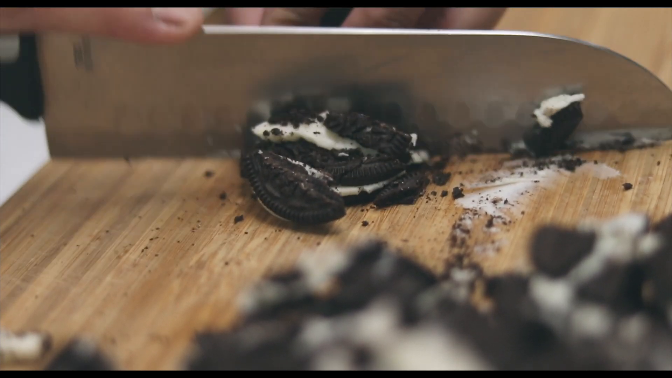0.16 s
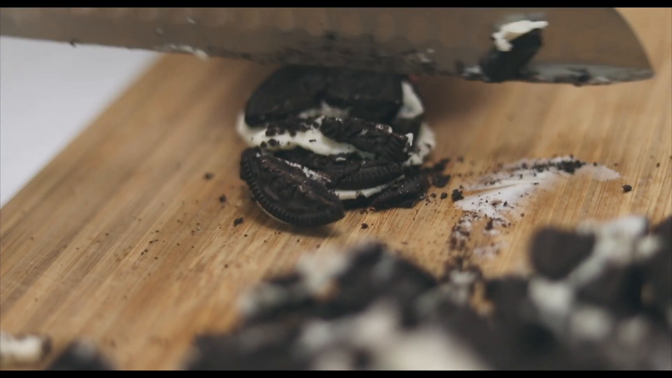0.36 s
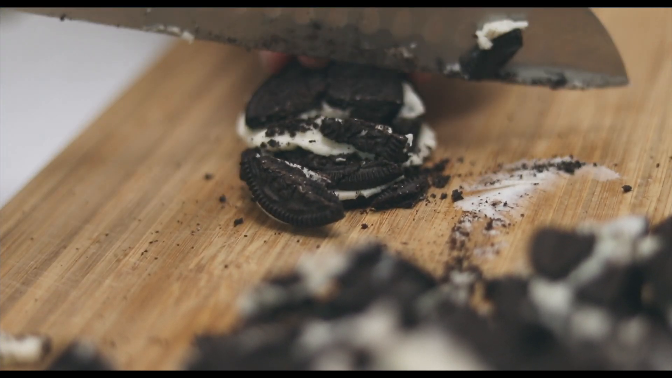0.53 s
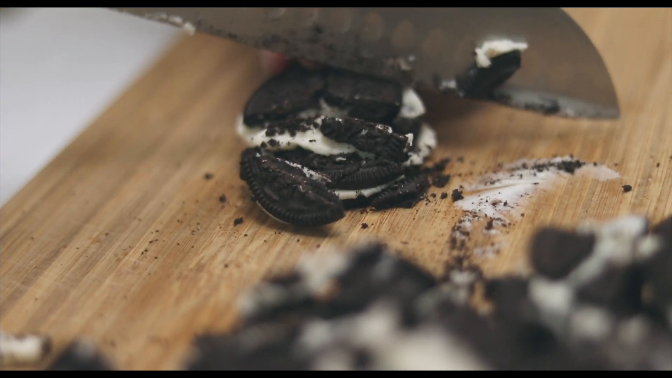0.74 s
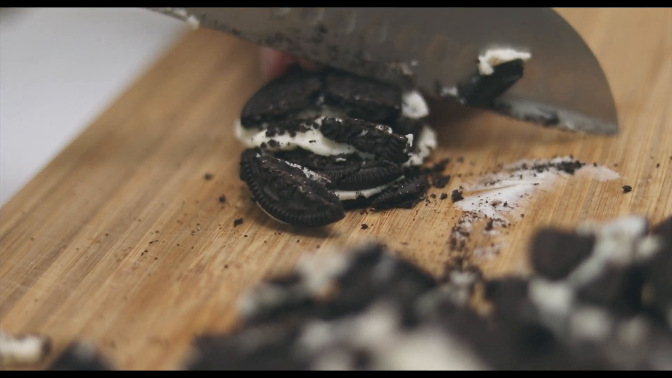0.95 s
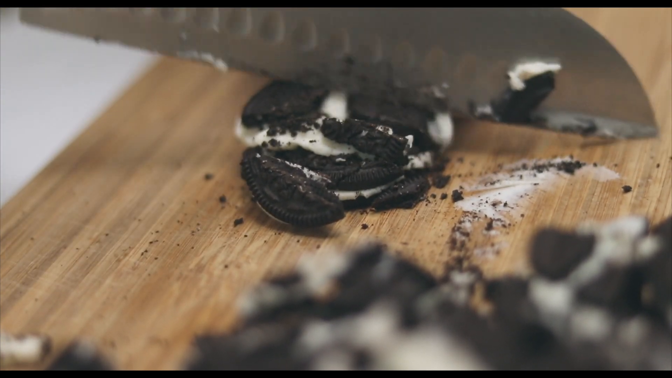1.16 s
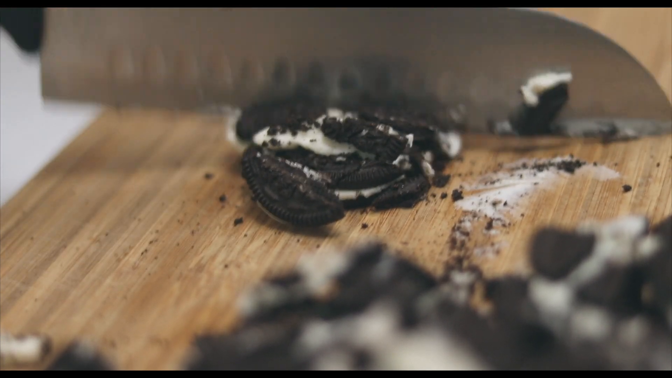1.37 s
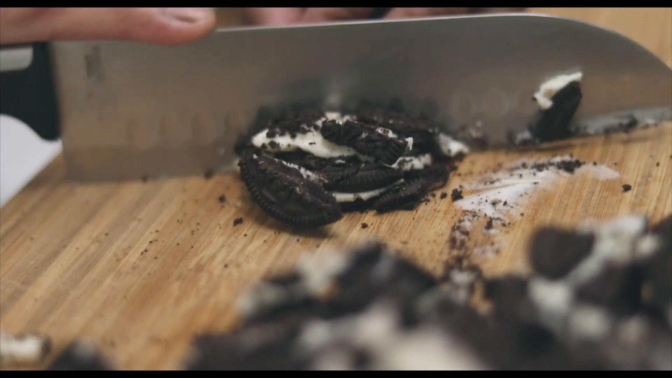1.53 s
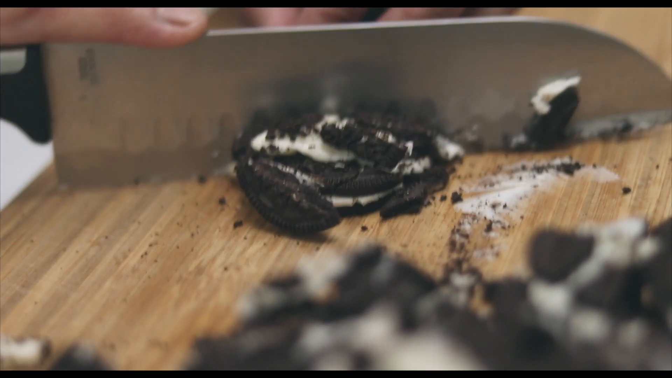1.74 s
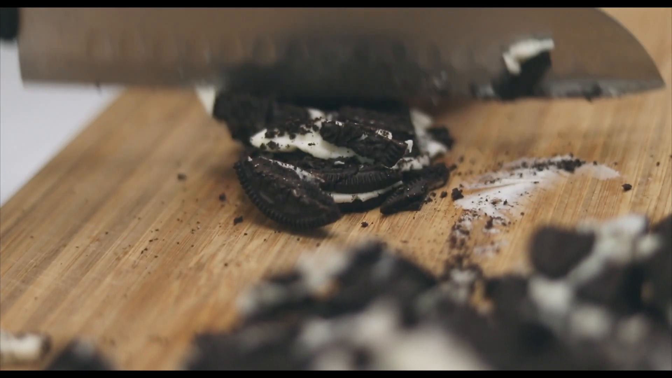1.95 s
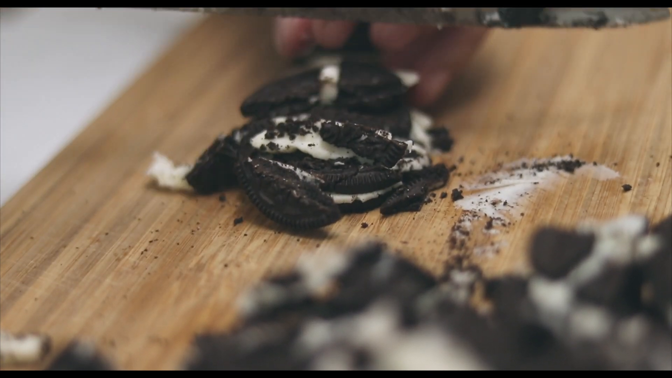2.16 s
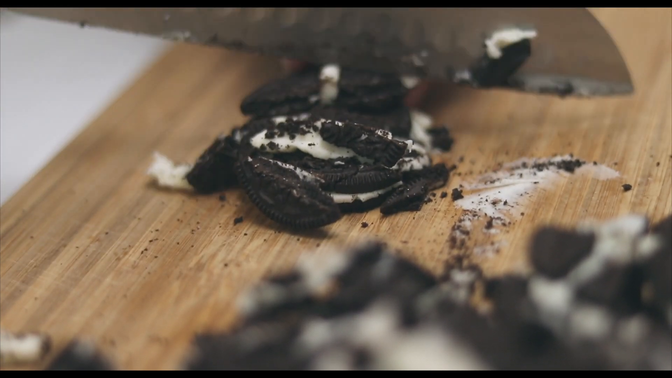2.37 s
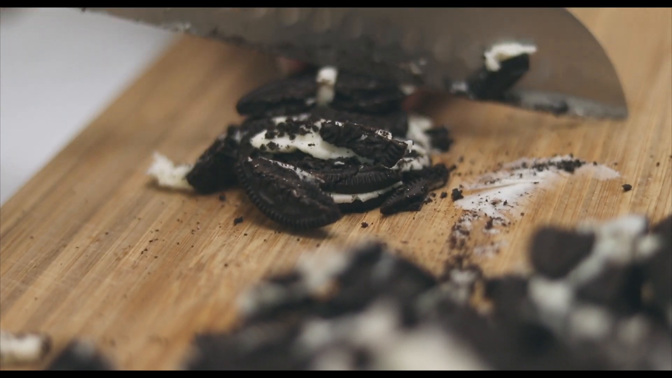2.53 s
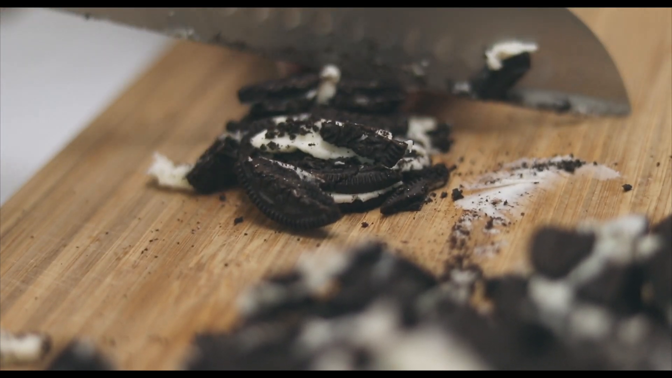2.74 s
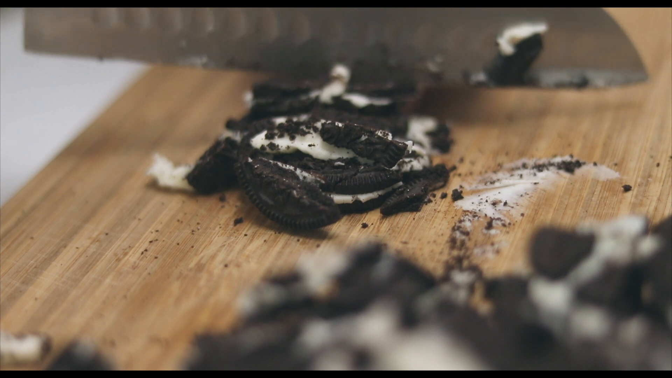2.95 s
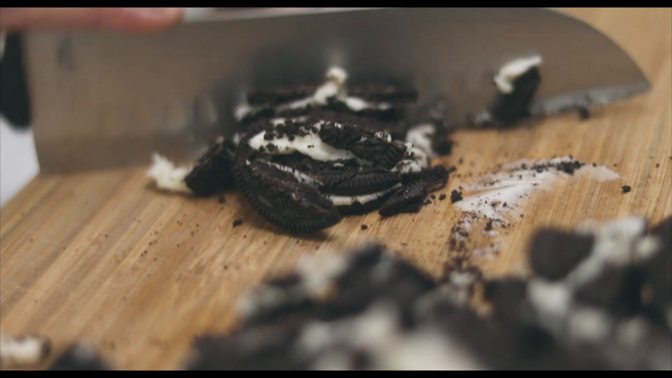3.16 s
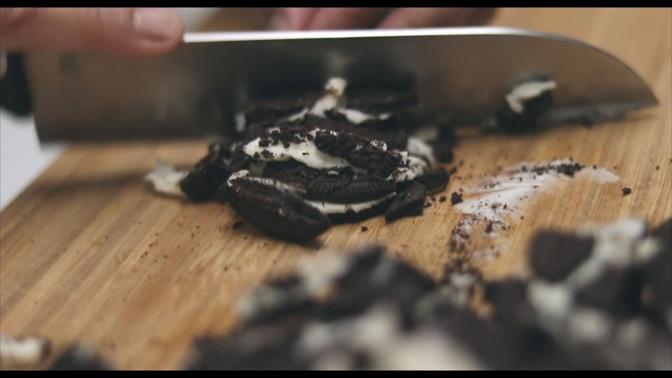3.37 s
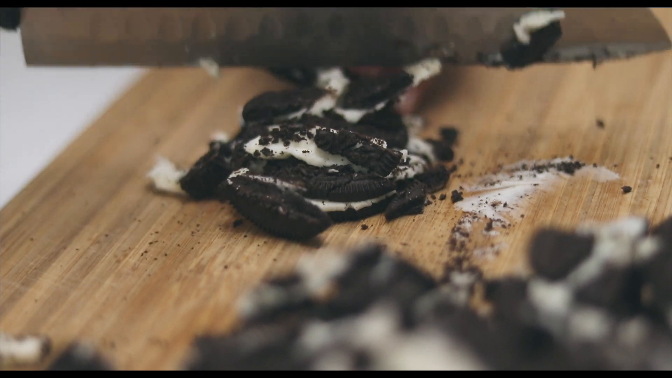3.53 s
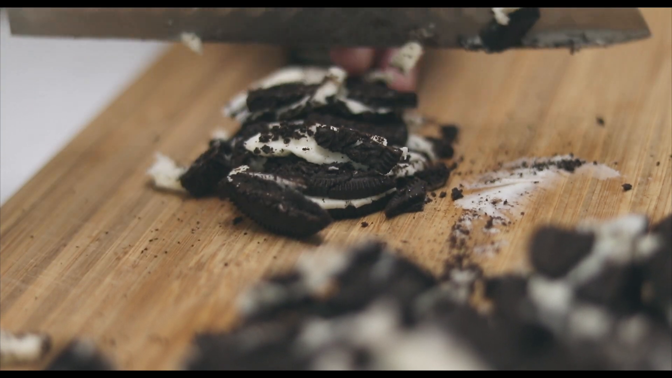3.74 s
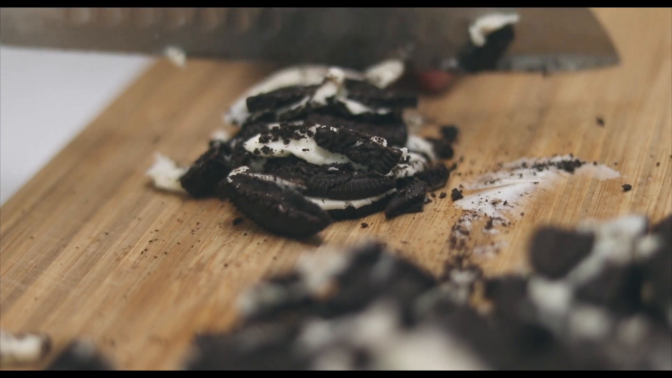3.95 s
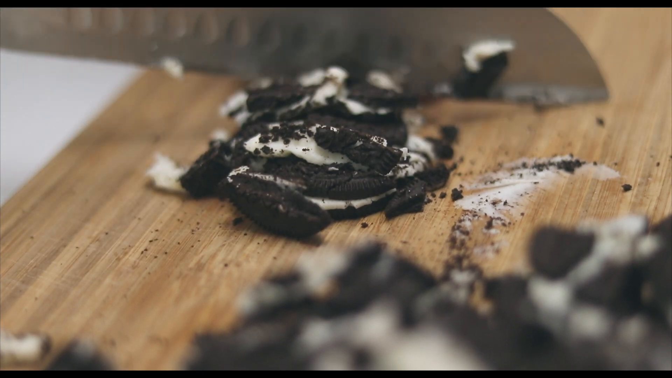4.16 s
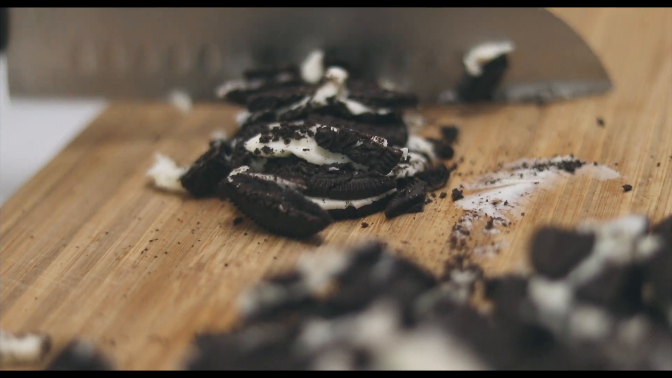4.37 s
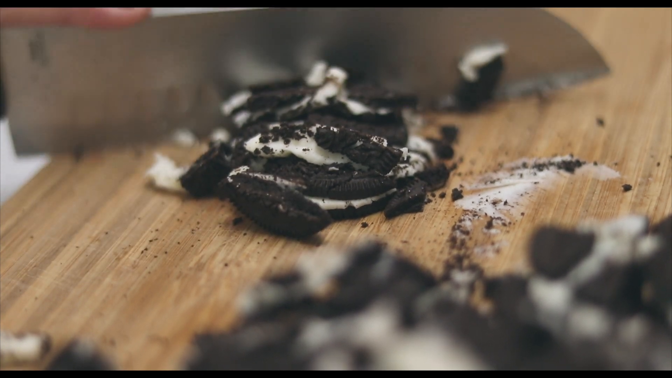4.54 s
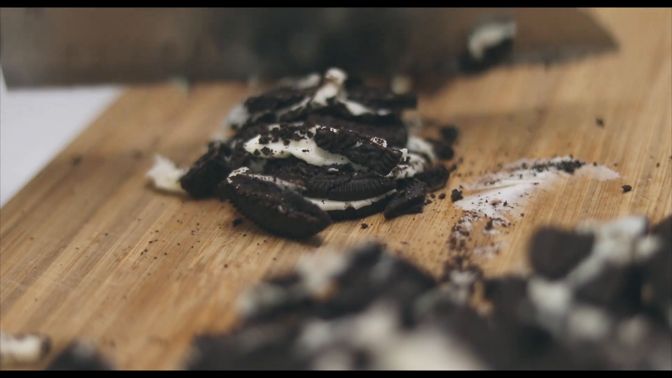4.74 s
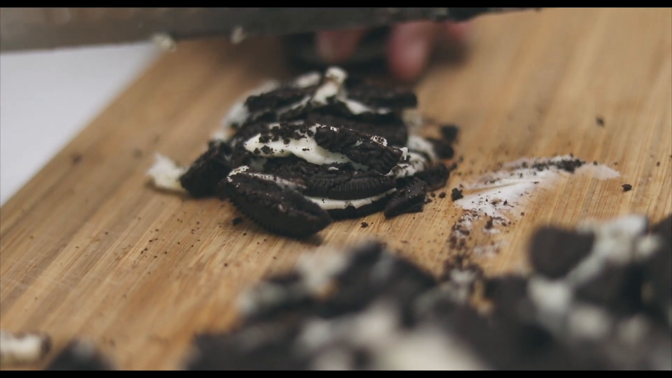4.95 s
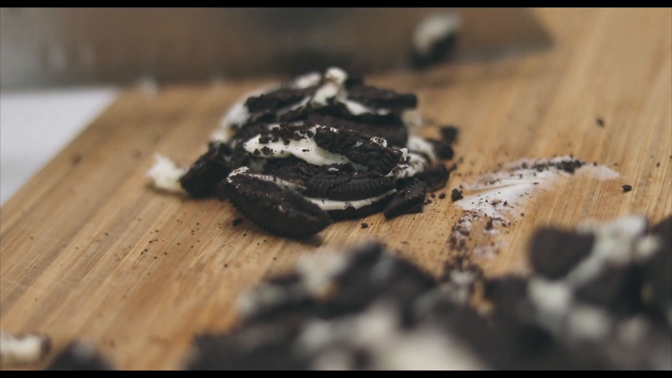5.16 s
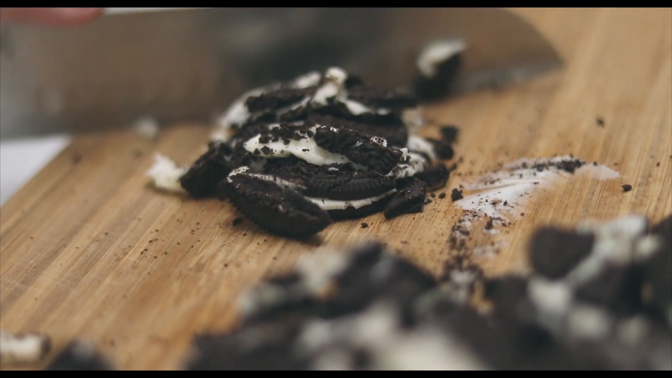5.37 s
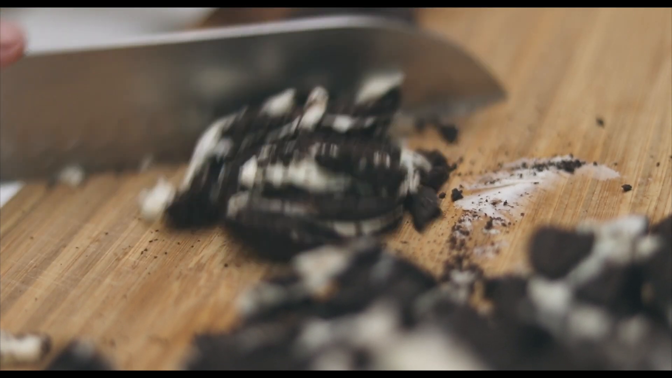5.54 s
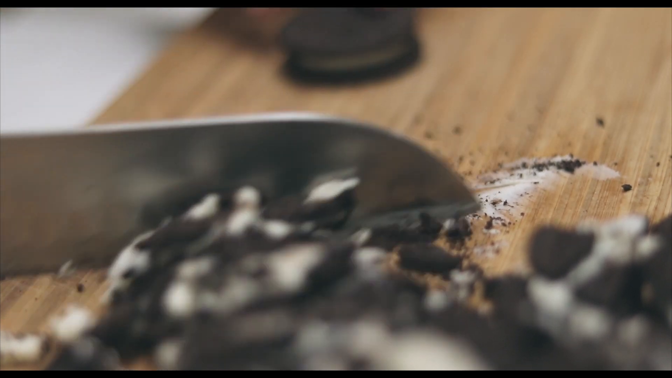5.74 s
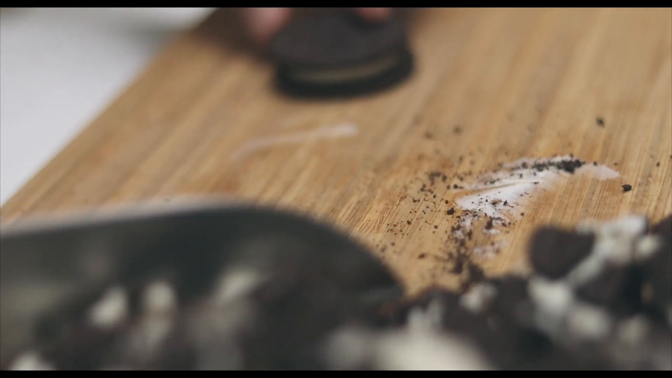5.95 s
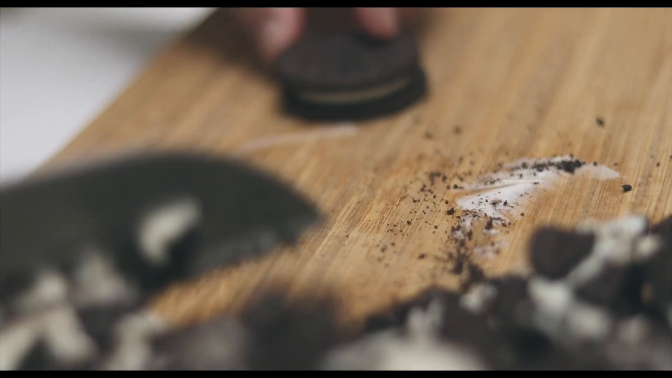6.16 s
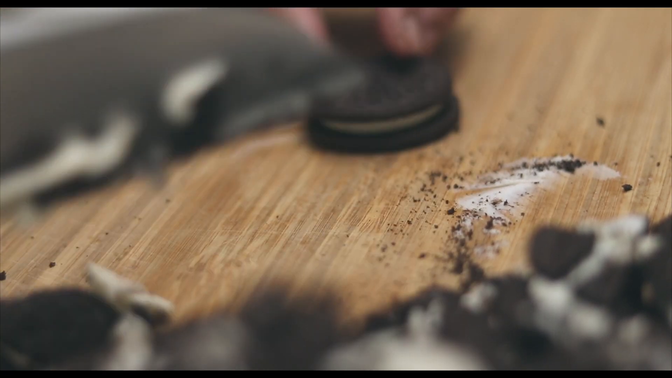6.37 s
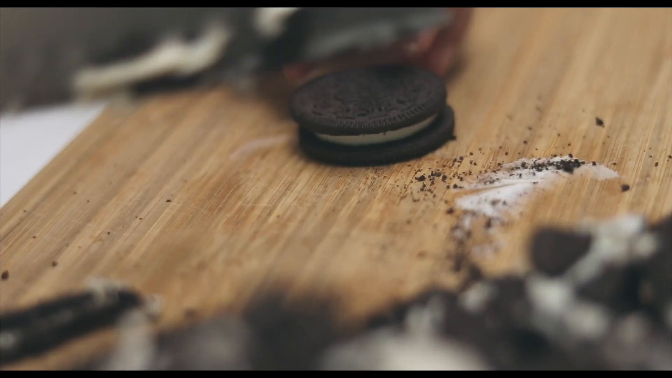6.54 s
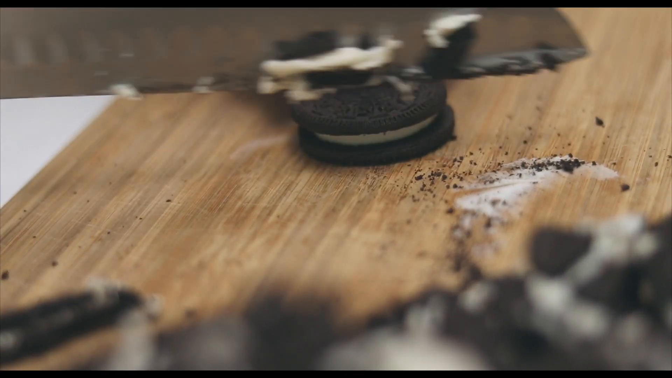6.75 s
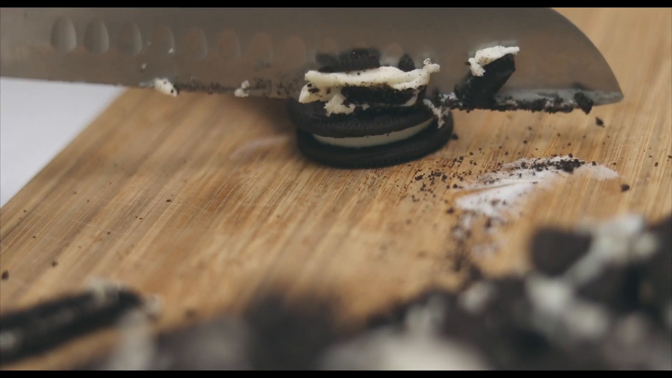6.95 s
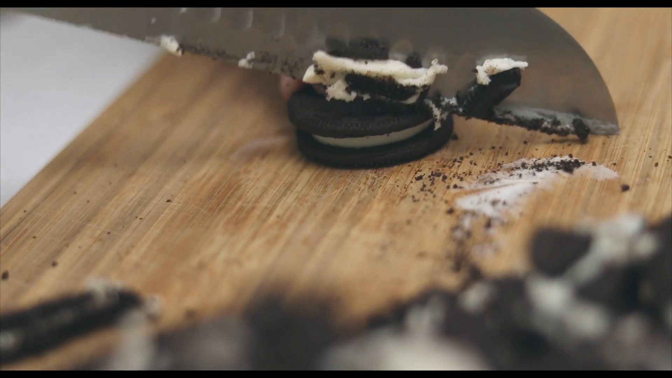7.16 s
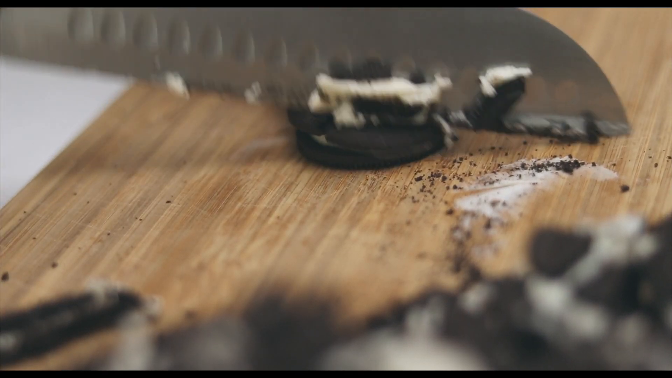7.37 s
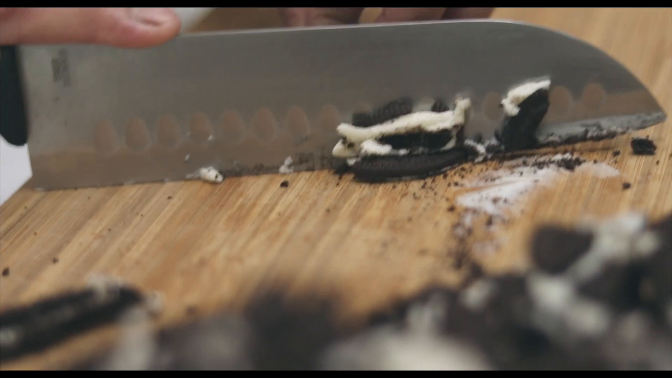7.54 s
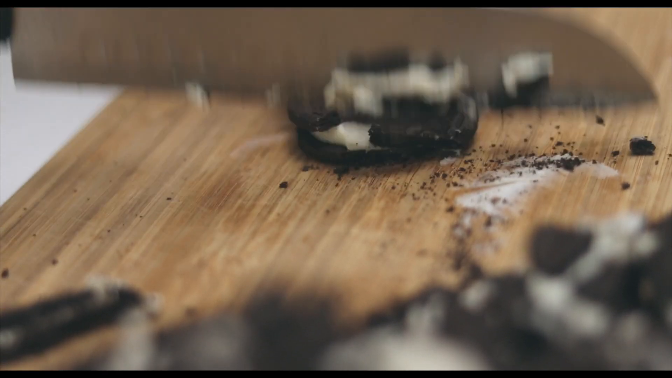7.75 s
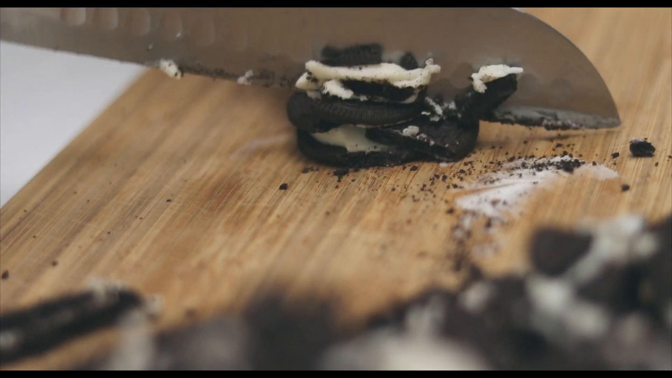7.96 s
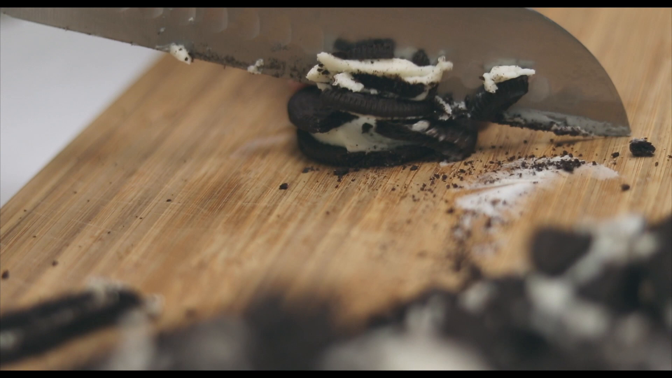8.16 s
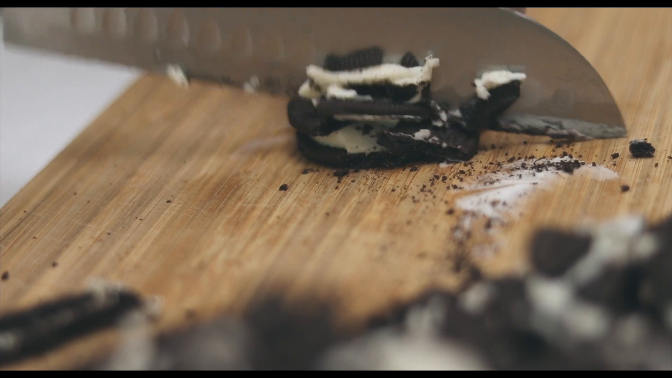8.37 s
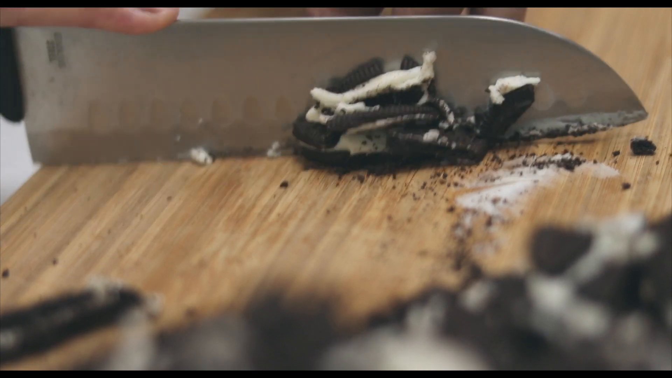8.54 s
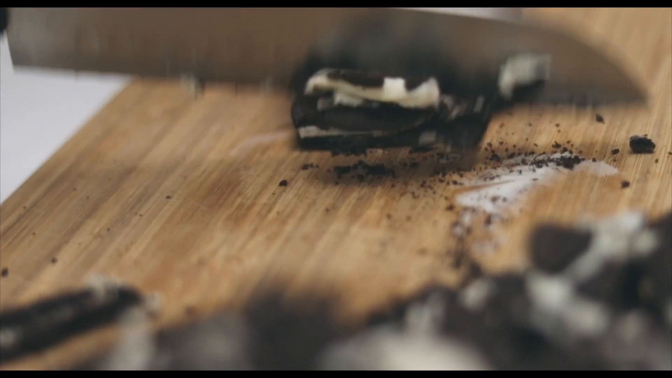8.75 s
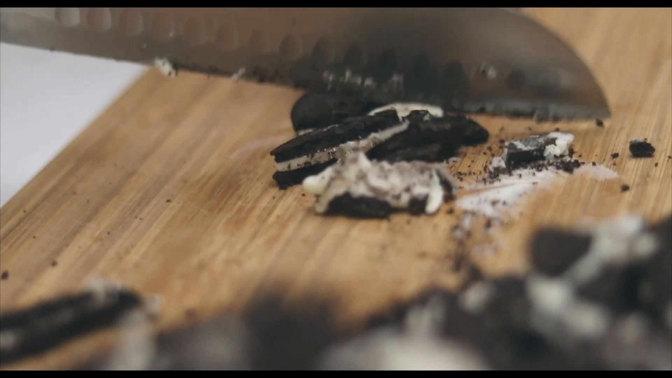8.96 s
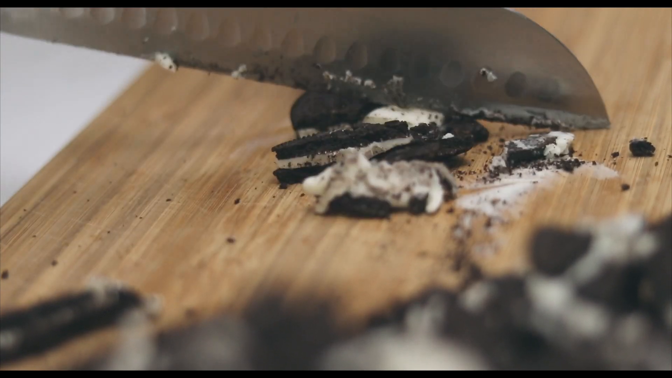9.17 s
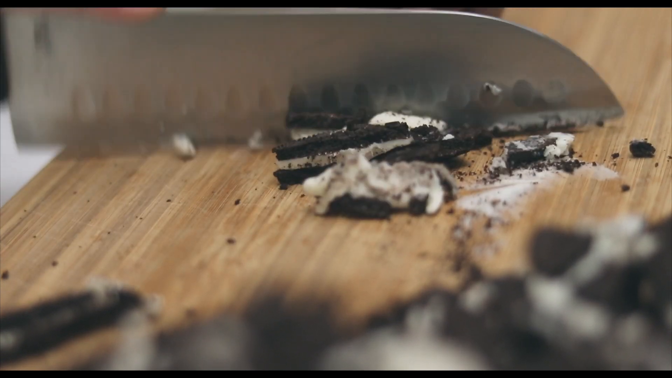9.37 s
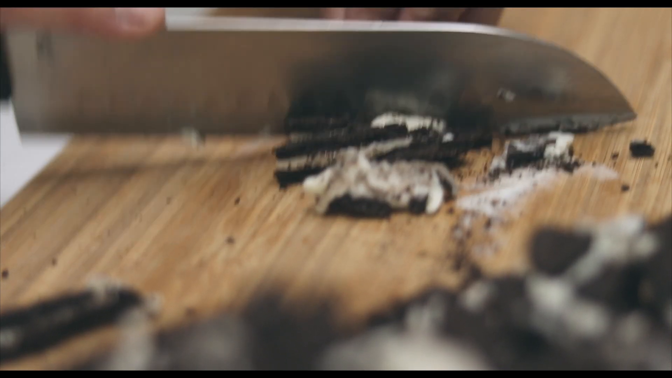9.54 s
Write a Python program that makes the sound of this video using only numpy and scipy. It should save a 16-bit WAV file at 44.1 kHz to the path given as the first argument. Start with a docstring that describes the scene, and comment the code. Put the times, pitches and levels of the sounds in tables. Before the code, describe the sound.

A heavy kitchen knife chops crisp cream-filled cookies on a wooden board, very close to the microphone. Sharp snaps and gritty crunches lead into hard knocks with brief blade ring. Around the middle the blade scrapes pieces aside, singing slightly, then smaller, drier cuts follow. The kitchen adds a short, lively tail over faint air and hum.

```python
"""First comes the crisp crackle of a knife leaning on sandwich cookies, with sticky filling peeling off.
Each cut snaps and crunches through the biscuit and knocks on a wooden board, close to the microphone.
Midway the blade sweeps the pieces aside. Tiny random cracks shake ringing board and blade tones;
the drag also makes the steel sing. Noise makes the board's thuds and the room air, and a faint hum runs on.
The kitchen rings after each blow, and the hardest blows overload the recorder."""
import sys
import numpy as np
from scipy import signal
from scipy.io import wavfile
from scipy.ndimage import map_coordinates

SR = 44100
rng = np.random.default_rng(int(sys.argv[2]) if len(sys.argv) > 2 else 0)


def int16_out(signal):
    """Quantize to a 16-bit WAV file."""
    q = np.round(np.clip(np.atleast_2d(signal).T, -1, 1) * 32767)
    wavfile.write(sys.argv[1], SR, q.astype(np.int16))


N = 423801

# steady room air and an appliance hum: (frequency [Hz], level [dB])
AIR_SPECTRUM = [(20, -14.5), (60, -13.5), (95, -17), (118, -2), (145, -6.5), (230, -11.5), (320, -14),
                (600, -19.5), (1000, -21), (1600, -30), (2200, -30), (5000, -35.5), (12000, -43.5),
                (16000, -52)]
HUM_TONES = [(120, -66.5), (322, -71.5), (440, -78)]
# sticky filling peeling off the steel: (time [s], length [s], level [dB])
PEELS = [(0, 0.1, -37.5), (0.229, 0.035, -52.5), (1.243, 0.14, -47), (1.934, 0.18, -60),
         (2.453, .025, -54.5), (5.406, 0.11, -43), (5.626, 0.099, -47)]
# sound colour of the peeling filling: (frequency [Hz], level [dB])
STICKY_SPECTRUM = [(100, -45.5), (1000, -17), (3000, -3), (6800, -10), (7800, 1.5), (9300, 1.5),
                   (10500, -10), (16000, -14)]
# the edge leans on a stack, crushes it, then the weight of the hand lands on the board:
# (time it gives way [s], leaning time [s], leaning level [dB],
#  crushing time [s], crushing level [dB], landing level [dB])
CUTS = [(0.038, 0.083, -25, 0.04, -21.5, -32), (1.451, .385, -33.5, .107, -23, -29),
        (3.125, 0.058, -39, 0.13, -27.5, -37), (4.472, .11, -43.5, 0.094, -34.5, -53),
        (7.507, 0.1, -46, 0.092, -33, -31.5), (8.524, 0.083, -35.5, 0.063, -28.5, -36),
        (9.408, 0.11, -46.5, 0.074, -26, -32)]
# fingers and edge nudging loose pieces: (time [s], length [s], level [dB])
NUDGES = [(1.93, 0.3, -68), (2.28, 0.087, -62), (2.6, 0.41, -62.5), (4.175, .05, -44), (5.68, .36, -49.5),
          (6.33, .25, -59), (7.425, 0.043, -44), (8.97, 0.077, -49.5)]
# a whole wafer caving in as a dense rasp: (time [s], length [s], level [dB])
COLLAPSES = [(3.117, 0.023, -17.5), (7.576, 0.024, -27), (8.562, .025, -31), (9.44, 0.05, -32.5)]
# larger pieces of biscuit snapping: (time [s], level [dB], brightness [dB per octave])
SNAPS = [(0.018, -17, -6), (1.17, -43, 10), (1.2073, -18.5, -1), (1.229, -32, 1), (1.2735, -9.5, -4.5),
         (1.407, -25, 1), (1.4549, -9.5, -7), (1.5108, -10, -3.5), (1.518, -5.5, 1), (1.529, -10, -2),
         (1.5467, -4.5, 2), (2.1856, -34.5, 1), (2.2448, -40, -1), (2.473, -33.5, -7), (2.6307, -22.5, -1),
         (2.731, -40.5, -1.5), (3.035, -28, 0), (3.0905, -16, -1), (3.1149, -2, -1), (3.257, -28, 1),
         (4.181, -30, -7), (6.423, -26.5, 0.5), (6.475, -43, -3), (6.9452, -27.5, -1), (6.9642, -30, -2),
         (7.154, -27, -1), (7.3147, -31, -3), (7.3365, -33, 2), (7.4254, -13, -2.5), (7.5774, -21, 4.5),
         (8.4859, -12.5, -0.5), (8.573, -1.5, 1.5), (8.7494, -28.5, 1), (8.9747, -20, 2), (8.988, -27, 2.5),
         (9.029, -40, -2), (9.0854, -27, -2.5), (9.147, -30.5, 0), (9.298, -39, 8.5), (9.364, -27.5, 1),
         (9.379, -26, -1), (9.4075, -21.5, 1)]
# blows through to the board:
# (time [s], level [dB], contact corner [Hz], crack against the knock [dB])
KNOCKS = [(0.0644, -2.5, 1700, -16), (0.6918, -33.5, 1170, -2.5), (0.9195, -23.5, 896, -26),
          (1.1177, -28, 1700, -30), (1.4845, 6.5, 1730, -14.5), (2.6586, -23.5, 980, -33),
          (3.099, -11, 1400, -26.5), (3.1292, 14, 2278, -14.5), (3.7918, -31.5, 2050, -16.5),
          (4.219, 1, 1860, -34), (4.4709, 10.5, 2660, -19), (4.5261, 15, 3200, -22.5),
          (5.2869, 4.5, 2390, -30), (7.258, -36.5, 690, -25), (7.5109, -9.5, 1298, -24),
          (7.5228, -9, 1400, -11), (7.5446, -7.5, 1480, -6.5), (7.6265, -23, 1110, -15.5),
          (8.1237, -36.5, 997, -37.5), (8.2257, -9.5, 1750, -29), (8.5254, 5, 1670, -19),
          (9.516, -25.5, 1615, -6)]
# pressure of the blade dragging crumbs over the wood, a short push, a long one
# and a light trailing off: (time [s], level [dB])
SWEEP_PRESSURE = [(5.405, -45.5), (5.48, -37), (5.53, -49.5), (5.63, -46.5), (5.68, -35.5), (5.82, -39.5),
                  (5.91, -35.5), (6.11, -48), (6.17, -50.5), (6.56, -55), (6.61, -70)]
# ringing tones of the board, the blade, and the blade bowed by the drag:
# (frequency [Hz], width [Hz], level [dB])
BOARD_TONES = [(310, 33, -18), (402, 87, -13.5), (457, 35, -7.5), (618, 270, -11), (895.2, 36, 5),
               (953, 110, 4), (1047, 110, -6), (1077.4, 30, -6.5), (1400, 150, -3.5), (1432, 51, -3),
               (1514, 53, -1)]
BLADE_TONES = [(1678, 74, 5.5), (1690, 360, -1.5), (2130, 86, -4), (2357, 90, -11), (2705, 120, -1),
               (2727, 71, -1.5), (3138, 68, -1), (3750, 120, -15), (3910, 120, -11), (4870, 190, -15.5),
               (5560, 310, -21.5), (5500, 150, -30), (7650, 150, -26.5), (8900, 230, -16.5),
               (9700, 130, -24.5)]
SINGING_TONES = [(937, 75, 7), (1736, 140, 6), (2720, 45, 5.5), (3900, 130, -6.5), (4730, 80, -16),
                 (5860, 63, -10.5), (7520, 170, -11), (9250, 120, -16), (10600, 450, -19)]
# sound colours of one tiny break, biscuit grinding along the steel, the scrape
# and the shuddering board: (frequency [Hz], level [dB])
CHIP_SPECTRUM = [(60, -26.5), (220, -31), (330, -12.5), (1000, -3.5), (2200, -15), (3500, -9), (5200, -15),
                 (6800, -19.5), (9500, -21.5), (12000, -26.5), (16000, -29.5)]
BITE_SPECTRUM = [(200, 0), (330, 10), (480, 5.5), (650, -1), (1000, 2), (1600, 1.5), (2200, -5),
                 (2780, 2.5), (3400, -6), (4000, 1.5), (6000, 1.5), (9000, 2.5), (16000, -1)]
SCRAPE_SPECTRUM = [(100, 4.9), (300, 15.2), (600, 8.6), (1100, 1.9), (1400, 1.4), (1800, 9.6), (3000, 3.7),
                   (5000, 6.6), (7500, 4.2), (11000, 7), (16000, 1.8)]
SHUDDER_SPECTRUM = [(10, -17), (28, -2), (55, -1.5), (85, -1.5), (130, -7), (220, -19), (400, -25.5),
                    (800, -44.5), (3000, -94)]
# how long the kitchen takes to fade by 60 dB: (frequency [Hz], fading time [s])
KITCHEN_FADE = [(60, 0.44), (160, 0.31), (420, .6), (1100, 0.83), (2900, 0.72), (7700, 0.75), (15000, 0.14)]
# strength of the kitchen's tail and of one echo off a wall: (frequency [Hz], level [dB])
TAIL_SPECTRUM = [(60, -18), (300, -7.5), (620, -13), (900, -19.5), (1250, -12), (1700, -18), (2200, -11),
                 (2750, -17.5), (3400, -14.5), (6000, -15.5), (10000, -17), (16000, -28.5)]
ECHO_SPECTRUM = [(400, -28), (900, -22), (1300, -21), (1700, -16), (2400, -23), (8000, -34)]

AIR_DB = -65.5
ECHO_S = 0.0407  # delay of the wall echo
BAND_LIMIT_HZ = 15700
RING_T = np.arange(4096) / SR  # time inside one hit [s]
LEAN_DB_PER_S, CRUSH_DB_PER_S = 59, 41  # the crumbling grows as the hand bears down
BITE_DB_PER_S, RELEASE_DB_PER_S = 1099, 902  # how quickly the crushing starts and stops
SHATTER_DB, SHATTER_DB_PER_S = -33, 702.5  # crumbling against the blow, and its decay
BLADE_DB, BLADE_DB_PER_DB = -3, 5.45  # harder blows set the blade ringing more
BLADE_MIN_DB, BLADE_MAX_DB = -10.5, 3.5
THUD_DB, THUD_DB_PER_DB, THUD_T60_S = -42.5, 0.52, 0.36  # the shudder grows slowly with the blow
GRIND_DB = -17  # shudder against the crushing
LANDING_S = 0.011  # from the end of a cut to the weight landing


def amp(db):
    """Turns decibels into a gain."""
    return 10 ** (np.asarray(db) / 20)


def evened(x):
    """Scales a sound to an average (rms) strength of one."""
    return x / np.sqrt(np.mean(x ** 2) + 1e-20)


def sized(x, crest=2.5, size=220):
    """Scales a hit to about unit peak, judged by the power of its first 5 ms."""
    return x / (crest * np.sqrt(np.mean(x[:size] ** 2)))


def read(points, hz):
    """Reads a table between its points, with frequency spaced as the ear hears pitch."""
    f, value = np.transpose(points)
    return np.interp(np.log(hz + 1), np.log(f + 1), value)


def add(mix, s, sound):
    """Adds a sound to the mix at its time in seconds."""
    part = mix[max(round(s * SR), 0):][:len(sound)]
    part += sound[:len(part)]


def colour(x, points, size=4096):
    """Filters a sound to the given spectrum, with no sound before its cause."""
    hz = abs(np.fft.fftfreq(size, 1 / SR))
    log_gain = np.log(amp(read(points, hz)))
    spectrum = np.exp(np.conj(signal.hilbert(log_gain)))
    taps = np.fft.ifft(spectrum).real
    return signal.oaconvolve(x, taps)[:len(x)]


def wander(per_s):
    """A random curve of about unit size, joining random points by straight lines."""
    knots = rng.standard_normal(int(N / SR * per_s) + 2)
    return np.interp(np.arange(N) / SR * per_s, np.arange(len(knots)), knots)


def follow(curve, fade_db_per_s=1500):
    """Gain along a level curve: it starts at once and fades quickly after its last point."""
    s, db = np.transpose(curve)
    t = np.arange(N) / SR
    fade_db = fade_db_per_s * np.clip(t - s[-1], 0, 0.5)
    return (t >= s[0]) * amp(np.interp(t, s, db) - fade_db)


def spells(rows, taper=0.45):
    """Gain that rises, holds and falls for each row of time, length and level."""
    level = np.zeros(N)
    for s, length, db in rows:
        add(level, s, amp(db) * signal.windows.tukey(int(length * SR), taper))
    return level


def ring(modes, spread_db=-0.2, detune=0.01, rise_s=0.00021):
    """Dying tones that swell within a cycle; balance, pitch and phase shift with the point of contact."""
    hz, width, db = np.transpose(modes)[:, :, None]
    a, b, phase = rng.standard_normal((len(modes), 3)).T[:, :, None]
    height = amp(db + spread_db * a) * 2 * np.pi * width / SR
    waves = np.sin(2 * np.pi * hz * (1 + detune * b) * RING_T + phase)
    decay = np.exp(-np.pi * width * RING_T)  # wider tones die sooner
    return (height * decay * waves).sum(0) * (1 - np.exp(-RING_T / rise_s))


def chip(decay_s=0.0018):
    """One fracture: a brief burst of noise over a broad band."""
    burst = rng.standard_normal(len(RING_T)) * np.exp(-RING_T / decay_s)
    return colour(burst / np.linalg.norm(burst), CHIP_SPECTRUM)


def fracture(board_db, blade_db):
    """One break in the biscuit, which also shakes the board and the blade."""
    return chip() + amp(board_db) * ring(BOARD_TONES) + amp(blade_db) * ring(BLADE_TONES)


def clicks(per_s, spread_db):
    """Clicks at random moments, with random size and direction."""
    size = amp(spread_db * np.minimum(rng.exponential(1, N), 4))
    return size * rng.choice([-1, 1], N) * (rng.random(N) < per_s / SR)


def crumble(per_s, spread_db, board_db, blade_db, count=14):
    """A stream of tiny fractures at several places along the edge."""
    train = clicks(per_s, spread_db)
    place = rng.integers(0, count, N)
    stream = np.zeros(N)
    for k in range(count):
        stream += signal.oaconvolve(train * (place == k), fracture(board_db, blade_db))[:N]
    return evened(stream)


def background():
    """Quiet room air from filtered noise, and a slightly wavering appliance hum."""
    t = np.arange(N) / SR
    drift = np.cumsum(rng.standard_normal((len(HUM_TONES), N)), axis=1) / np.sqrt(SR)
    hum = np.zeros(N)
    for (hz, db), slip in zip(HUM_TONES, drift):
        hum += amp(db) * np.sqrt(2) * np.sin(2 * np.pi * hz * t + 8.7 * slip)
    air = evened(colour(rng.standard_normal(N), AIR_SPECTRUM))
    return hum + amp(AIR_DB) * air


def crumbs(level_db=-74):
    """Loose crumbs shift faintly under the fingers and the resting blade."""
    return amp(level_db) * crumble(per_s=130, spread_db=-1.0, board_db=-3.0, blade_db=-8.5)


def peels():
    """Filling lets go of the steel in a fine, high, uneven crackle."""
    threads = clicks(per_s=1500, spread_db=4.5) * amp(4 * wander(90))
    return spells(PEELS) * evened(colour(threads, STICKY_SPECTRUM))


def leaning(touch_s=0.028):
    """Strength of the first cracking: it builds as the edge leans, until the biscuit gives way."""
    t = np.arange(N) / SR
    level = np.zeros(N)
    for s, length, db, _, _, _ in CUTS:
        touch = np.clip((t - s + length) / touch_s, 0, 1)
        level += amp(db - LEAN_DB_PER_S * abs(s - t)) * touch * (t < s)
    return level


def crushing():
    """Strength of the crumbling: cuts start fast, swell and stop; wafers cave in; blows shatter pieces."""
    t = np.arange(N) / SR
    level = spells(COLLAPSES, taper=0.51)
    for s, _, _, length, db, _ in CUTS:
        before = np.clip(s - t, 0, 1)
        inside = np.clip(t - s, 0, length)
        after = np.clip(t - s - length, 0, 1)
        swell_db = CRUSH_DB_PER_S * (inside - length / 2)
        level += amp(db - BITE_DB_PER_S * before + swell_db - RELEASE_DB_PER_S * after)
    for s, db, _, _ in KNOCKS:  # each blow pulverises what lies under the edge
        add(level, s, amp(db + SHATTER_DB - SHATTER_DB_PER_S * t[:SR // 2]))
    return level


def crunch():
    """Biscuit gives separate small cracks under a light touch, then crumbles in avalanches in the cut."""
    cracks = crumble(per_s=450, spread_db=5, board_db=-0.5, blade_db=-1.5, count=6)
    grains = crumble(per_s=2000, spread_db=4.0, board_db=-4.0, blade_db=2.5)
    avalanches = amp(2 * wander(260))
    light = (leaning() + spells(NUDGES)) * evened(colour(cracks, BITE_SPECTRUM))
    return light + crushing() * evened(colour(grains, BITE_SPECTRUM) * avalanches)


def thuds(rise_s=0.022, lean_db=-9):
    """Board and counter shudder with each blow and cut, and when the weight of the hand lands."""
    t = np.arange(SR) / SR
    power = (amp(GRIND_DB) * crushing() + amp(lean_db) * leaning()) ** 2
    blows = [(s, THUD_DB + THUD_DB_PER_DB * db) for s, db, _, _ in KNOCKS]
    landings = [(s + length + LANDING_S, db) for s, _, _, length, _, db in CUTS]
    for s, db in blows + landings:
        shudder = amp(db - 60 * t / THUD_T60_S) * (1 - np.exp(-t / rise_s))
        add(power, s, shudder ** 2)
    return np.sqrt(power) * evened(colour(rng.standard_normal(N), SHUDDER_SPECTRUM))


def kitchen(x, build_s=0.011):
    """A spread-out tail that builds up and dies band by band, and one clear echo off a wall."""
    hz, t, z = signal.stft(rng.standard_normal(SR), SR, nperseg=256)
    fade = amp(-60 * t / read(KITCHEN_FADE, hz)[:, None]) * (1 - np.exp(-t / build_s))
    fade /= np.sqrt(np.mean(fade ** 2, axis=1, keepdims=True) * SR)  # equal energy in each band
    tail = colour(signal.istft(z * fade, SR, nperseg=256)[1], TAIL_SPECTRUM)
    add(tail, ECHO_S, colour(signal.unit_impulse(256), ECHO_SPECTRUM))
    return signal.oaconvolve(x, tail)[:N]


def snaps(run_s=0.00027):
    """Larger breaks against the steel: the crack branches as it runs; smaller, drier pieces sound brighter."""
    out = np.zeros(N)
    size = len(RING_T)
    for s, db, tilt_db in SNAPS:
        branches = rng.standard_normal(size) * (rng.random(size) < 0.04) * np.exp(-RING_T / run_s)
        crack = signal.unit_impulse(size) + branches
        snap = signal.oaconvolve(crack, fracture(board_db=1.0, blade_db=-2.0))[:size]
        snap = colour(snap, BITE_SPECTRUM)
        snap = colour(snap, [(500, 0), (16000, 5 * tilt_db)])  # a slope over five octaves
        add(out, s, amp(db) * sized(snap, crest=3.94))
    return out


def knocks(rattle_db=-7):
    """The edge meets the wood: a longer contact leaves only the low tones, and trapped crumbs crack."""
    out = np.zeros(N)
    for s, db, contact_hz, crack_db in KNOCKS:
        blade_db = np.clip(BLADE_DB + BLADE_DB_PER_DB * db, BLADE_MIN_DB, BLADE_MAX_DB)
        contact = signal.butter(4, contact_hz, fs=SR, output="sos")
        # the thin blade chatters in the cut
        rattle = colour(chip(), [(500, -20.0), (1300, 4.5), (2700, -3), (5000, 8.5)])
        blade = ring(BLADE_TONES) + amp(rattle_db) * rattle
        body = signal.sosfilt(contact, ring(BOARD_TONES) + amp(blade_db) * blade)
        crack = chip(decay_s=0.0012)
        add(out, s, amp(db) * (sized(body) + amp(crack_db) * crack / abs(crack).max()))
    return out


def sweep(sing_db=-2, freeing_db_per_s=8, uneven_db=3.0, shifting_db=7.0):
    """The dragged blade catches and slips over wood and crumbs; the steel sings more as it comes free."""
    rub = crumble(per_s=6000, spread_db=3.6, board_db=-1, blade_db=-3)
    rub = evened(colour(rub, SCRAPE_SPECTRUM))
    steel = signal.oaconvolve(clicks(per_s=5500, spread_db=4.0), ring(SINGING_TONES))[:N]
    drift = 45 * wander(8)  # in samples
    # the tones bend as the contact moves
    steel = evened(map_coordinates(steel, [np.arange(N) + drift], order=3))
    freeing_s = np.clip(np.arange(N) / SR - SWEEP_PRESSURE[0][0], 0, 0.5)
    singing = amp(sing_db + freeing_db_per_s * freeing_s)
    catching = amp(uneven_db * wander(45))
    scrape = evened((rub + singing * steel) / np.hypot(1, singing) * catching)
    pressure = follow(SWEEP_PRESSURE)
    body = signal.sosfiltfilt(signal.butter(2, 6500, fs=SR, output="sos"), scrape)
    # firmer is brighter
    grit = 2.96 * (pressure / pressure.max()) * amp(shifting_db * wander(14))
    return pressure * (body + grit * (scrape - body))


def scene(lowest_hz=290):
    """Everything on the board, heard directly and through the room."""
    near = crumbs() + peels() + crunch() + snaps() + knocks() + sweep()
    # small things radiate little bass
    near = signal.sosfilt(signal.butter(5, lowest_hz, "high", fs=SR, output="sos"), near)
    return (background() + thuds() + near + kitchen(near))[None]


def record(dry):
    """The hardest blows flatten at full scale; then the highest treble is cut off."""
    clipped = np.clip(dry, -1, 1)
    band_limit = signal.firwin(511, BAND_LIMIT_HZ, window=("kaiser", 8), fs=SR)
    return signal.oaconvolve(clipped, band_limit[None], "same")


dry = scene()
out = record(dry)
int16_out(out)
```